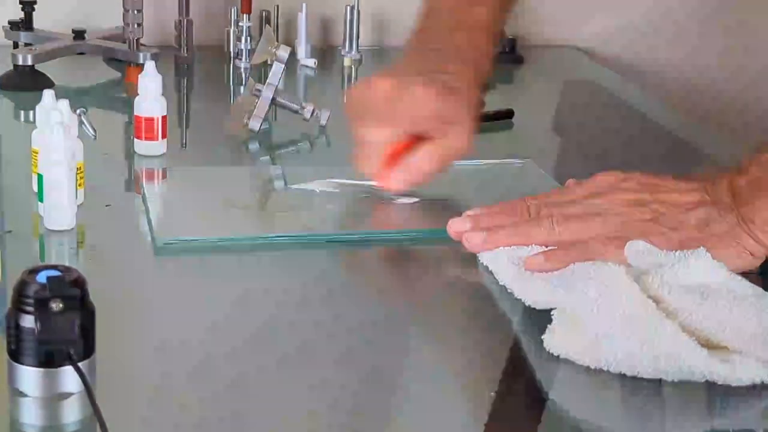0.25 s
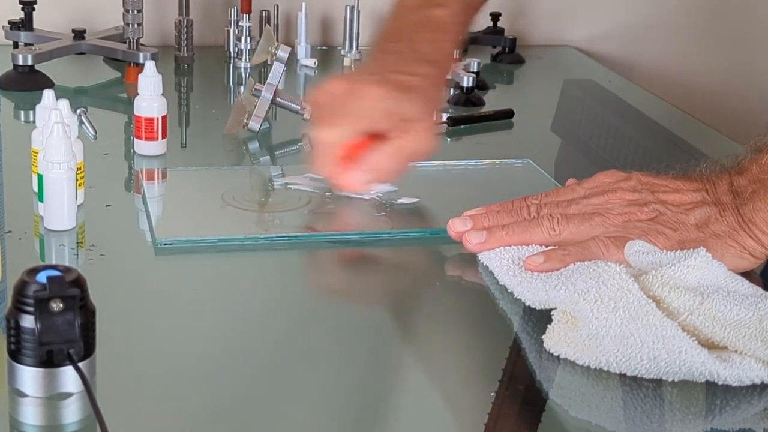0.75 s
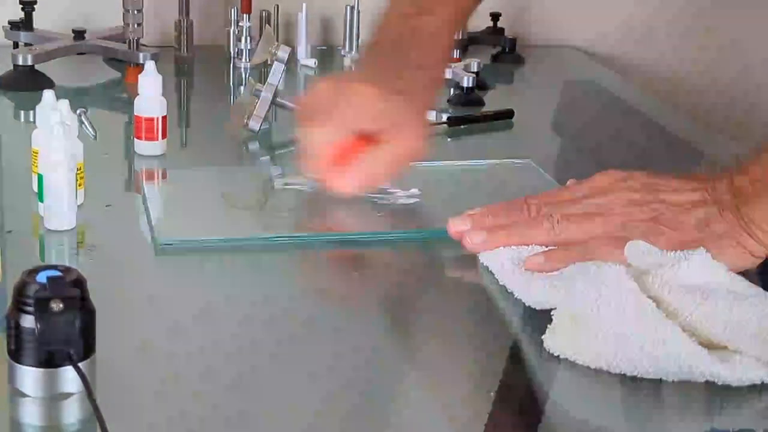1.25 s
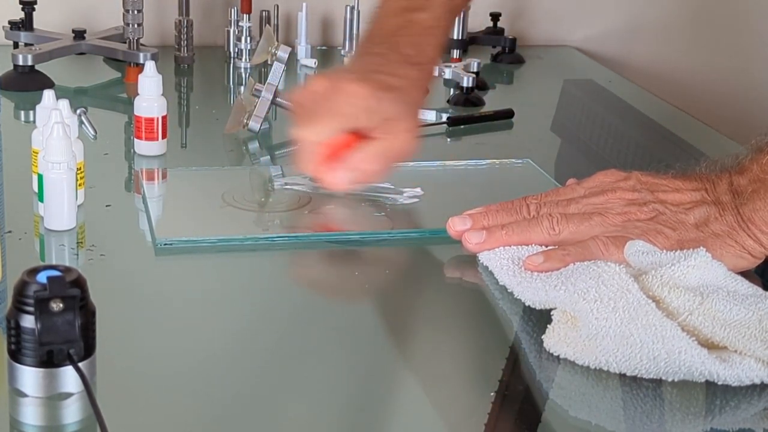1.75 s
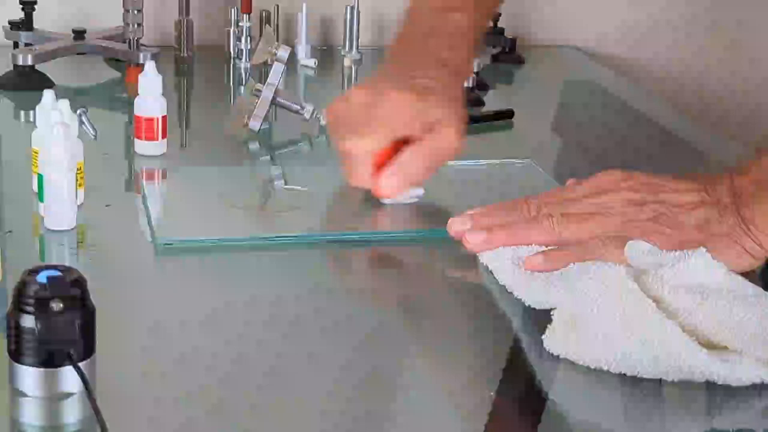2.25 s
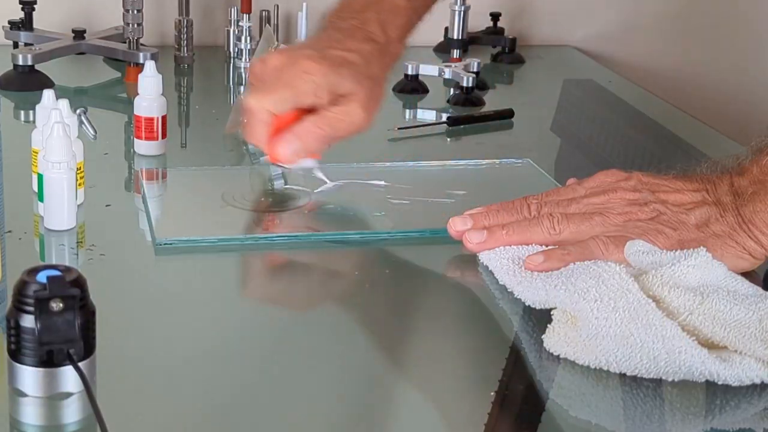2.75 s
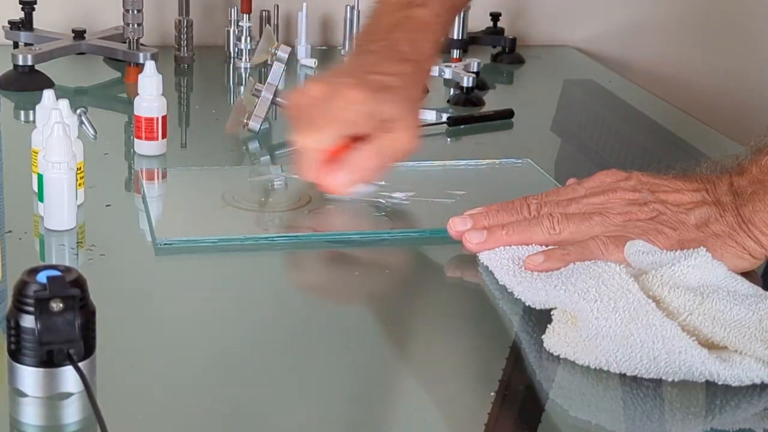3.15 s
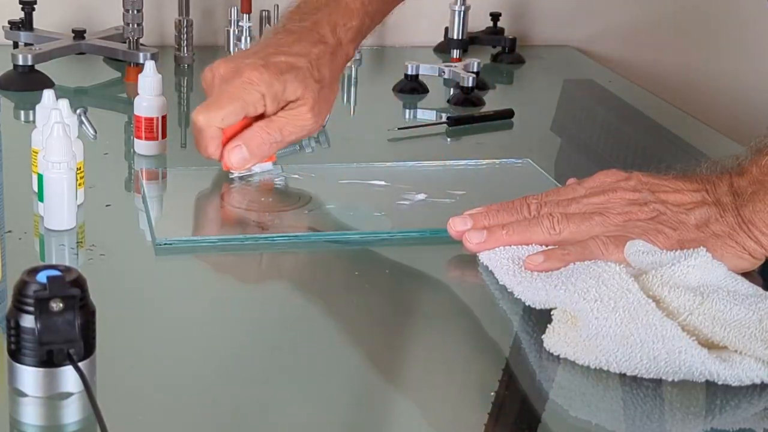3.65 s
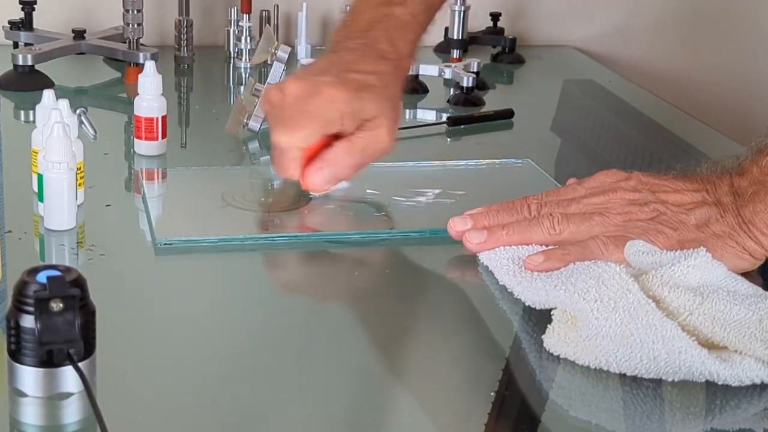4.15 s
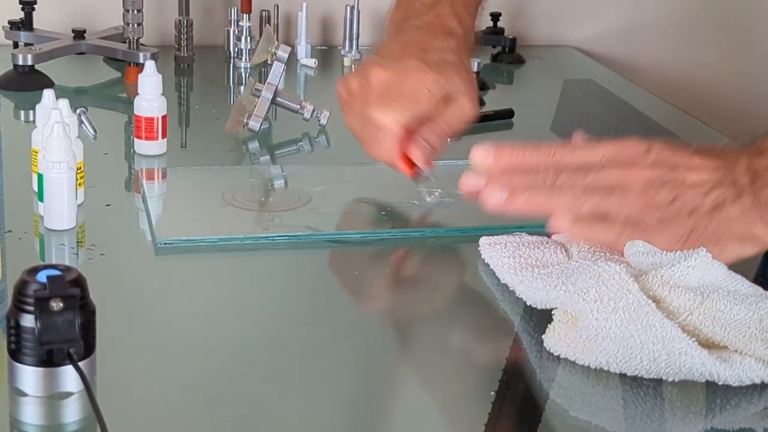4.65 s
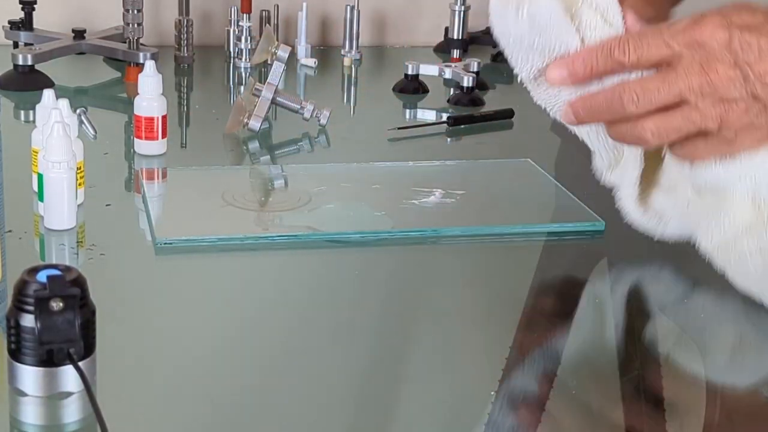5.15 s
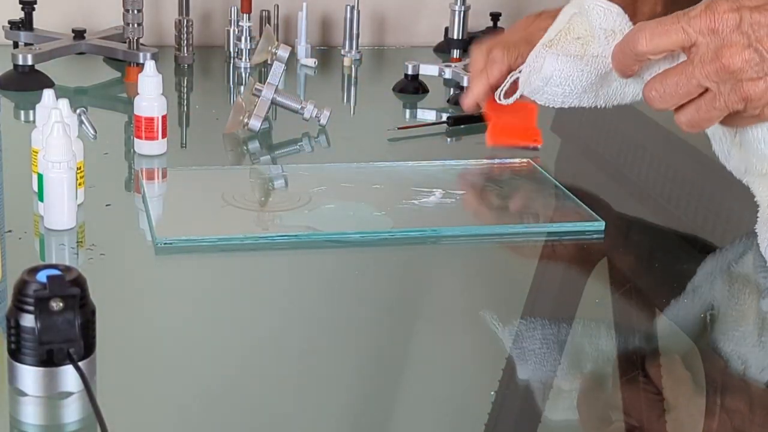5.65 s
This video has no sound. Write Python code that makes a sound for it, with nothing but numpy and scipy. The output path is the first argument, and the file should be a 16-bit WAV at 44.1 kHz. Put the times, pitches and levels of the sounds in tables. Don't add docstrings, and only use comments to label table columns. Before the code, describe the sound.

A nearby stereo microphone catches fast back-and-forth scraping on glass over a table, with hard bright catches and short dull booms. It soon thins to dry, light scratching with a few ticks and a single sharper knock. Near the end come soft cloth brushes, a tiny high squeak and a quick plastic clatter, in a small, short-echo room with wavering low hum.

```python
import sys
import numpy as np
from scipy import signal
from scipy.fft import rfft, irfft, next_fast_len
from scipy.io import wavfile
from scipy.ndimage import map_coordinates

SR = 44100
rng = np.random.default_rng(int(sys.argv[2]) if len(sys.argv) > 2 else 0)


def pcm_store(signal):
    levels = np.round(np.clip(np.atleast_2d(signal), -1, 1) * 32767)
    wavfile.write(sys.argv[1], SR, levels.astype(np.int16).T)


def ratio(d):
    e = np.asarray(d, float) / 20
    return 10 ** e


N = 259749
LIGHT_DB = -67
RISE = 400
SHORT = 4096


def unit(x):
    return x / np.sqrt(np.mean(np.abs(x) ** 2) + 1e-20)


def along(points, hz):
    f, value = np.transpose(points)
    return np.interp(np.log(hz + 1), np.log(f + 1), value)


def curves(rows):
    s, *columns = np.transpose(rows)
    return [np.interp(np.arange(N) / SR, s, column) for column in columns]


def wobble(rate):
    knots = rng.standard_normal(int(N * rate / SR) + 4)
    return map_coordinates(knots, [np.arange(N) * rate / SR])


def filtered(x, response):
    m = next_fast_len(N + SR // 2)
    return irfft(rfft(x, m) * response(np.fft.rfftfreq(m, 1 / SR)), m)[..., :N]


def ringing(modes, f, scatter_db=0):
    total = 0
    for k, (center, width, db) in enumerate(modes):
        strength = (-1) ** k * ratio(db + scatter_db * rng.standard_normal())
        damping = 1j * f * abs(width)
        total = total + strength * damping / (center * center - f * f + damping)
    return total


def gripped(modes, hz, slope_db):
    return [(c, w, db - slope_db * abs(np.log2(c / hz))) for c, w, db in modes]


def grit(shape, spread_db):
    grains = rng.standard_normal(shape)
    size_db = spread_db * np.minimum(rng.exponential(size=shape), 5)
    return unit(grains * ratio(size_db))


# frequency in Hz, correlation from -1 to 1.
LIKENESS = [(60, .96), (130, .88), (300, .65), (700, .5), (1500, .33), (3000, .15), (7000, 0), (15000, -.2)]


def rush(spectrum):
    def spread(hz):
        turn = np.arccos(np.clip(along(LIKENESS, hz), -1, 1)) / 2
        return ratio(along(spectrum, hz)) * [np.cos(turn), np.sin(turn)]
    mid, side = filtered(rng.standard_normal((2, N)), spread)
    return unit(np.array([mid + side, mid - side]))


# frequency in Hz, level in dB.
HUM_TONES = [(117, -65.5), (156, -71.5), (235, -71.5)]
# time in seconds, level in dB.
DRONE_SWELL = [(0, -73), (.26, -53.5), (.42, -69), (.8, -62), (1.8, -57), (2.0, -71.5), (2.3, -56.5),
               (2.9, -64), (3.2, -52), (3.42, -69.5), (4.2, -53), (4.4, -58.5), (4.55, -56), (4.78, -69.5),
               (5.08, -66), (5.27, -55), (5.62, -60), (5.89, -74)]
# frequency in Hz, level in dB per Hz.
RUMBLE_COLOUR = [(18, -62.5), (30, -27), (114, 2), (166, -8.5), (193, -35.5), (223, -13.5), (250, -11),
                 (320, -37), (550, -120)]
# frequency in Hz, level in dB per Hz.
MURMUR_COLOUR = [(88, -41), (150, -3.5), (210, -9.5), (517, -10), (710, -18), (881, -24), (1300, -21),
                 (1690, -62), (2860, -120)]
# frequency in Hz, level in dB per Hz.
AIR_COLOUR = [(410, -32), (700, 1.5), (876, -10), (1190, -13), (1410, -7.5), (1810, -9.5), (2330, -5.5),
              (2520, -1), (4010, -16.5), (6280, -14.5), (8980, -20), (14500, -38), (16500, -51.5)]
# time in seconds, sliding level in dB.
HAND_PRESSURE = [(0.0, -61), (0.31, -67), (0.52, -60), (0.65, -47.5), (0.98, -51), (1.13, -47), (1.36, -56),
                 (1.92, -66), (2.62, -77), (3.12, -69), (3.64, -75), (3.85, -66), (4.91, -68),
                 (5.53, -71.5), (5.89, -57)]


def background():
    drone_db, lean_db = curves(DRONE_SWELL)[0], curves(HAND_PRESSURE)[0]
    t = np.arange(N) / SR
    hum = 0
    for hz, db in HUM_TONES:
        level = ratio(db + 2.5 * wobble(3.4))
        cycles = hz * t + 0.16 * wobble(11.0)
        hum = hum + level * np.sin(2 * np.pi * cycles)
    drone = ratio(drone_db + 4) * np.sin(2 * np.pi * 58.8 * t)
    rumble_db = -55.5 + 0.24 * (drone_db + 62.5)
    rumble = ratio(rumble_db - 5.5 + 0.7 * wobble(13)) * rush(RUMBLE_COLOUR)
    shake = ratio(-68 + 0.95 * (lean_db - LIGHT_DB))
    murmur = (ratio(-66) + shake) * ratio(0.31 * wobble(12)) * rush(MURMUR_COLOUR)
    return rumble + murmur + hum + drone + ratio(-67.0) * rush(AIR_COLOUR)


# frequency in Hz, time to fall by 60 dB in seconds.
ROOM_DECAY = [(200, 0.27), (1000, 0.14), (3000, 0.11), (8000, 0.12), (15000, 0.05)]


def room(x, count=4):
    dull = filtered(x, lambda f: f ** 4 / (f ** 4 + 800 ** 4))
    place = (np.arange(N) // 7400 + np.arange(count)[:, None]) % count == 0
    hz, t, z = signal.stft(rng.standard_normal((count, 2, SR // 3)), SR, nperseg=256)
    fade = ratio(-60 * t / along(ROOM_DECAY, hz)[:, None])
    tail = signal.istft(z * fade, SR, nperseg=256)[1]
    tail = tail / np.linalg.norm(tail, axis=2, keepdims=True)
    tail = np.pad(tail, [(0, 0), (0, 0), (90, 0)])
    return signal.fftconvolve((place * dull)[:, None], tail, axes=2).sum(axis=0)[:, :N]


# frequency in Hz, phase in radians.
LEFT_LEAD = [(60, 0), (700, .3), (1460, .6), (2500, .7), (3000, 1.1), (4400, 1.7), (6000, 1.5), (9000, 1.9),
             (16000, 2.1)]


def ports(x, share):
    delay_s = rng.uniform(0.00041, 0.0037, (2, 4, 1))
    gain = rng.normal(0, 0.78, (2, 4, 1))
    gain = gain / np.linalg.norm(gain, axis=1, keepdims=True) * 0.74

    def heard(f):
        ahead = np.exp(0.5j * share * along(LEFT_LEAD, f) * np.array([[1], [-1]]))
        echoes = (gain * np.exp(-2j * np.pi * f * delay_s)).sum(axis=1)
        return ahead + f * f / (f * f + 6000 ** 2) * echoes
    return filtered(x, heard)


# middle in seconds, length in seconds, level in dB.
CLOTH_RUSTLES = [
    (4.696, 0.067, -66.5),
    (4.737, 0.072, -66),
    (4.91, 0.12, -69),
    (5.34, 0.15, -67),
]
# frequency in Hz, width in Hz, level in dB.
CLOTH_MODES = [(2900, 660, -1), (3900, 890, 4)]


def cloth():
    t = np.arange(N) / SR
    level = 0
    for s, length, db in CLOTH_RUSTLES:
        level = level + ratio(db) * np.cos(np.pi * np.clip((t - s) / length, -0.5, 0.5)) ** 2
    clumps_db = 3.4 * wobble(110)
    fibres = unit(filtered(grit(N, spread_db=3.0), lambda f: ringing(CLOTH_MODES, f)))
    return level * ratio(clumps_db) * fibres


# frequency in Hz, level in dB, time to fall by 60 dB in seconds.
CLINK_TONES = [(2260, -19.5, 0.7), (3300, 8, 0.078), (5300, -11, 0.18), (4250, -1, 0.25), (6500, -0.5, 0.3),
               (8942, -14, 0.23)]


def clink():
    t = np.arange(N) / SR
    tones = 0
    for hz, db, t60 in CLINK_TONES:
        level = ratio(db - 56.5 - 60 * t / t60 + 3.5 * wobble(60))
        tones = tones + level * np.sin(2 * np.pi * hz * t)
    return tones


# time in seconds, pitch in Hz, level in dB.
SQUEAK_PATH = [
    (5.5, 8860, -93),
    (5.53, 9160, -82),
    (5.57, 9400, -73),
    (5.59, 9280, -93),
    (5.64, 9300, -99),
]


def squeak():
    t = np.arange(N) / SR
    hz, db = curves(SQUEAK_PATH)
    on = (t > SQUEAK_PATH[0][0]) & (t < SQUEAK_PATH[-1][0])
    level = on * ratio(db - 5.0 + 2.6 * wobble(90))
    return level * np.sin(2 * np.pi * np.cumsum(hz + 40 * wobble(120)) / SR)


def contact(t60, rise_s, snap, slip, size):
    t = (np.arange(size) - RISE) / SR
    fade = ratio(-60 * np.abs(t) / max(t60, 0.003))
    force = np.where(t < 0, np.exp(t / rise_s), fade) * grit(size, spread_db=1.0)
    slips = RISE + np.cumsum(rng.uniform(0.03, 0.064, size=3) * t60 * SR).astype(int)
    force[RISE] += snap
    force[slips] += slip * snap * np.array([0.6, -0.5, 0.4])
    return rfft(force)


def add(out, s, force, response, db):
    ring = irfft(force * response)
    out[round(s * SR):][:len(ring)] += ratio(db) * ring / np.abs(ring).max()


# frequency in Hz, width in Hz, level in dB.
TOOL_TOP = [(8130, 790, -5.5), (8730, 820, 0.5), (10010, 2700, -2.5), (11140, 2800, -5.5),
            (13980, 3000, -17.5)]


def clacks(events, grips, core, edge, slip, rise_s):
    out, f = np.zeros(N + SHORT), np.fft.rfftfreq(SHORT, 1 / SR)
    for s, db, hz, edge_db, t60 in events:
        grip = [grips[0], *(g for g in grips if g[0] <= s)][-1]
        _, focus_db, edge_hz, top_db, snap = grip
        force = contact(t60, rise_s, snap, slip, size=SHORT)
        chatter = contact(t60, rise_s, 0.7 * snap, slip, size=SHORT)
        add(out, s, force, ringing(gripped(core, hz, focus_db), f, scatter_db=3.0), db + 0.5)
        edge_modes = gripped(edge, edge_hz, slope_db=5)
        add(out, s, force, ringing(edge_modes, f, scatter_db=3.0), db + edge_db + 6.0)
        add(out, s, chatter, ringing(TOOL_TOP, f, scatter_db=1.5), db + edge_db + top_db + 9.5)
    return out[RISE:][:N]


# time in seconds, peak in dB, loudest pitch in Hz,
# brightness in dB, time for the chatter to fall by 60 dB in seconds.
HOLDER_HITS = [
    (5.6524, -21, 1870, -10.5, 0.029),
    (5.683, -22, 2060, -18, 0.035),
    (5.69, -33, 2020, -9.5, 0.03),
    (5.7073, -14.5, 2230, -4.5, 0.031),
    (5.7125, -27, 2240, -5, 0.033),
    (5.7185, -25.5, 3340, 0, 0.053),
    (5.726, -39, 3340, 5, 0.034),
    (5.743, -36.5, 3340, -3, 0.057),
    (5.759, -24.5, 2700, -2, 0.088),
]
# time in seconds, focus in dB per octave,
# loudest edge pitch in Hz, top level in dB, snap over chatter as a ratio.
HOLDER_TOUCH = [
    (5.6, 11.5, 3800, -11, 26),
    (5.67, 20, 4200, -4.5, 19),
    (5.698, 7.9, 3900, -4, 28),
    (5.735, 9.3, 4380, -6, 17),
]
# frequency in Hz, width in Hz, level in dB.
HOLDER_MODES = [(1800, 490, 0.091), (2230, 440, 0.85), (2700, 590, -1.7), (3340, 230, -0.62)]
# frequency in Hz, width in Hz, level in dB.
HOLDER_EDGE_MODES = [(3730, 220, 7), (4580, 280, -5.5), (5000, 1300, -20), (6580, 1200, 5.5)]


def dropped_holder():
    return clacks(HOLDER_HITS, HOLDER_TOUCH, HOLDER_MODES, HOLDER_EDGE_MODES, slip=0.91, rise_s=0.0026)


# time in seconds, pane level in dB, loudest pane pitch in Hz, boom in dB.
GLASS_PUSHES = [(0.156, -33, 310, -54), (0.476, -29, 415, -40), (0.592, -26.5, 560, -35.5),
                (0.61, -22, 560, -34.5), (0.762, -17.5, 690, -32.5), (0.833, -36.5, 417, -43),
                (0.924, -33, 607, -36.5), (0.946, -26, 500, -33), (1.015, -34.5, 410, -35),
                (1.118, -28.5, 640, -31.5), (1.188, -32, 570, -41), (1.244, -36.5, 580, -39),
                (1.274, -24, 513, -33), (1.352, -44, 382, -62), (1.421, -34.5, 433, -37),
                (1.576, -43, 713, -36.5), (1.595, -37, 412, -48), (1.682, -49, 310, -41.5),
                (1.757, -46, 410, -48), (1.787, -39, 640, -56.5), (2.075, -35, 412, -44),
                (2.54, -47.5, 303.6, -45), (2.844, -45.5, 406, -47.5), (3.628, -44, 278, -50),
                (3.7896, -25.5, 570, -42), (3.803, -42.5, 297, -49), (5.356, -48, 700, -65.5),
                (4.167, -51, 490, -49.5), (4.857, -45, 300, -43.5), (4.872, -47, 318, -57)]
# time in seconds, pane level in dB, loudest pane pitch in Hz.
HOLDER_THUDS = [
    (5.652, -43.5, 439),
    (5.688, -41, 390),
    (5.711, -35, 420),
    (5.74, -38.5, 700),
    (5.76, -41.5, 332),
]
# frequency in Hz, width in Hz, level in dB.
PANE_MODES = [(287, 17, 1), (310, 39, -3.5), (412, 23, 2), (491, 18, -2.5), (542, 39, -4.5),
              (621, 27, -0.5), (693, 51, -3.5), (992, 55, -4)]
# frequency in Hz, width in Hz, level in dB.
TABLE_MODES = [(58.3, 2.5, -2), (79, 9.1, -3.5), (97.4, 6, -10.5)]
# frequency in Hz, width in Hz, level in dB.
TABLE_TOP_MODES = [(156.8, 8, -1), (178, 6.1, -14)]


def glass():
    size = 8192
    out, f = np.zeros(N + size), np.fft.rfftfreq(size, 1 / SR)
    thuds = [(*thud, -69) for thud in HOLDER_THUDS]
    for s, db, hz, boom_db in [*GLASS_PUSHES, *thuds]:
        force = contact(t60=0.059, rise_s=0.0022, snap=9, slip=1.0, size=size)
        force = force / (1 + 1j * f / 1300) ** 2
        add(out, s, force, ringing(gripped(PANE_MODES, hz, slope_db=11.5), f, scatter_db=1.5), db + 0.5)
        add(out, s, force, ringing(TABLE_MODES, f, scatter_db=1.0), boom_db)
        top_db = -45 + 0.64 * (db + 35)
        add(out, s, force, ringing(TABLE_TOP_MODES, f), top_db)
    return out[RISE:][:N]


# time in seconds, level in dB, pitch in Hz, time to fall by 60 dB in seconds.
BLADE_PINGS = [(.485, -26, 3070, .02), (0.48, -27.5, 2900, .015), (.596, -24, 2285, 0.027),
               (.611, -23, 4140, 0.025), (.611, -36, 6940, .015), (.618, -23, 6050, .025),
               (.76, -21, 3900, .025), (.765, -19, 2410, 0.011), (.767, -27, 9990, 0.017),
               (.773, -24.5, 1152, 0.044), (.951, -16, 2950, .02), (.951, -21, 5300, 0.02),
               (.98, -31.5, 1380, .03), (1.115, -15, 5760, 0.015), (1.117, -21, 2670, 0.023),
               (1.117, -23, 4720, 0.019), (1.117, -22, 9160, 0.012), (1.163, -39, 1710, .05),
               (1.195, -34.5, 2760, .05), (1.274, -29.5, 1230, .04), (3.789, -39, 6230, 0.02),
               (2.0756, -30.5, 2000, 0.01), (2.844, -46.5, 2700, 0.019), (3.793, -27.5, 1720, 0.021),
               (3.791, -33.5, 3120, .025), (4.177, -54.5, 6250, 0.03), (4.177, -62, 5300, .025),
               (5.689, -37, 2046, 0.044), (5.708, -19, 8660, 0.018), (5.718, -29.5, 3970, 0.034),
               (5.762, -35, 2700, 0.03), (5.762, -42, 4400, 0.051)]
# time in seconds, level in dB, pitch in Hz, time to fall by 60 dB in seconds.
PANE_BLOOMS = [(.592, -25.5, 530, 0.049), (.616, -32.5, 965, 0.036), (.66, -39, 475, .06),
               (.761, -24, 618, .05), (.83, -39, 1243, .04), (.962, -32.5, 896, .05),
               (1.014, -33, 692, 0.037), (1.277, -34.5, 960, 0.047), (1.112, -33, 650, 0.062),
               (1.121, -29, 897, 0.055), (1.2, -38, 546, 0.054), (1.288, -36, 475, 0.064),
               (3.789, -29, 605, 0.036), (3.805, -40.5, 480, 0.047), (2.08, -50, 713, 0.056),
               (4.865, -45, 340, .09), (5.72, -41, 710, 0.077), (5.722, -37, 347, 0.08),
               (5.736, -48, 400, .06)]


def pings():
    out, t = np.zeros(N + SHORT), np.arange(SHORT) / SR
    for s, db, hz, t60 in [*BLADE_PINGS, *PANE_BLOOMS]:
        swell = 1 - np.exp(-t * hz / 2.5)
        fade = ratio(db + 6.5 - 60 * t / t60)
        out[round(s * SR):][:SHORT] += fade * swell * np.sin(2 * np.pi * hz * t)
    return out[:N]


# middle in seconds, blade level in dB.
SAW_STROKES = [(0.647, -38.5), (0.733, -52.5), (0.828, -44.5), (0.926, -38), (0.991, -40.5), (1.1, -39.5),
               (1.165, -46.5), (1.258, -48), (1.35, -66), (1.425, -48.5), (1.521, -71), (1.598, -52.5),
               (1.684, -58.5), (1.762, -53)]
# middle in seconds, length in seconds, blade level in dB,
# hiss against the blade in dB.
LIGHT_STROKES = [(1.9, 0.036, -74.5, -2.5), (2.212, 0.075, -64, -10.5), (2.312, 0.04, -71.5, 0.5),
                 (2.665, 0.076, -61, -14), (2.97, 0.18, -63.5, -10), (3.096, 0.066, -62.5, -6),
                 (3.167, 0.13, -60.5, -7.5), (3.288, 0.065, -64.5, -6.5), (3.349, 0.083, -62, -8),
                 (3.774, 0.071, -62.5, -5), (3.906, 0.044, -63.5, -10), (3.996, 0.1, -62, -23),
                 (4.134, 0.078, -66.5, -5), (4.187, 0.048, -64.5, -8.5), (4.212, 0.04, -64, -6),
                 (4.418, 0.034, -62.5, -12), (4.565, 0.043, -66.5, -8.5), (3.938, 0.056, -70, -14),
                 (4.349, 0.16, -63.5, -11), (4.402, 0.069, -62, -14.5), (4.535, 0.095, -66, -20.5),
                 (5.568, 0.073, -71.5, -15.5), (1.042, .03, -60, -13)]
# middle in seconds, length in seconds, hiss level in dB.
HAND_BRUSHES = [(0.008, 0.11, -61.5), (4.62, 0.022, -70), (4.688, 0.073, -71.5), (4.782, 0.056, -82),
                (4.908, 0.13, -65.5), (5.205, 0.064, -71.5), (5.289, 0.11, -66.5), (5.353, 0.12, -61.5),
                (5.573, 0.27, -74), (5.695, 0.13, -46.5), (5.76, 0.21, -61)]
# frequency in Hz, width in Hz, level in dB.
SLIDING_BLADE = [(1540, 120, -1), (1980, 390, 1.5), (2280, 120, 4), (2650, 420, -5)]
# frequency in Hz, width in Hz, level in dB.
SLIDING_EDGE = [(3900, 1000, -2), (5560, 380, -3), (6220, 570, -3), (7400, 520, -7), (8800, 500, -5),
                (10100, 740, -6.5), (11990, 3200, -15.5)]


def slide():
    lean_db, t = curves(HAND_PRESSURE)[0], np.arange(N) / SR
    hiss_db = LIGHT_DB - 3 + 1.3 * (lean_db - LIGHT_DB)
    level = ratio([lean_db, hiss_db]) * ratio(-6.0)
    passes = [(s, 0.068, db, db - 4.5) for s, db in SAW_STROKES]
    passes += [(s, length, db, db + hiss) for s, length, db, hiss in LIGHT_STROKES]
    passes += [(s, length, db - 3, db) for s, length, db in HAND_BRUSHES]
    for s, length, *db in passes:
        near = slice(max(round((s - length / 2) * SR), 0), round((s + length / 2) * SR))
        level[:, near] += ratio(db)[:, None] * np.cos(np.pi * (t[near] - s) / length) ** 2
    clumps_db = 1.8 * wobble(45) + 1.1 * wobble(160)
    blade = unit(filtered(grit(N, spread_db=6.0), lambda f: ringing(SLIDING_BLADE, f)))
    hiss = unit(filtered(grit(N, spread_db=3.5), lambda f: ringing(SLIDING_EDGE, f)))
    return ratio(clumps_db) * (level[0] * blade + level[1] * hiss)


# time in seconds, peak in dB, loudest blade pitch in Hz,
# brightness in dB, time for the chatter to fall by 60 dB in seconds.
RESIN_CATCHES = [(0.155, -28.5, 1800, -1.5, 0.028), (0.4763, -12.5, 2230, -6, 0.017),
                 (0.5918, -5.5, 1960, -10, 0.026), (0.6113, -7.5, 1830, -4.5, 0.025),
                 (0.7614, -1.5, 2310, -14.5, 0.03), (0.834, -23.5, 1980, -12.5, 0.03),
                 (0.9087, -41, 2290, -1, 0.016), (0.9241, -23, 2130, -21, 0.054),
                 (0.9472, -6, 2280, -8, 0.03), (1.015, -20.5, 1900, -12, 0.039),
                 (1.1144, -4.5, 1730, -9, 0.031), (1.1886, -19, 1700, -12.5, 0.034),
                 (1.2455, -33, 1560, -7.5, 0.23), (1.2765, -11.5, 2260, -14, 0.027),
                 (1.3523, -37.5, 1980, -15.5, 0.021), (1.4251, -32, 2100, -12.5, 0.0036),
                 (1.519, -44.5, 1700, -8.5, 0.026), (1.574, -36.5, 1700, -18, 0.026),
                 (1.5937, -34, 1540, -16, 0.056), (1.682, -43, 1957, -16, 0.034),
                 (1.7879, -29, 1620, -13.5, 0.039)]
# time in seconds, peak in dB,
# loudest blade pitch in Hz, brightness in dB, time for the chatter to fall by 60 dB in seconds.
EDGE_TAPS = [(2.073, -25.5, 1800, -13.5, 0.012), (2.541, -31, 3270, 3, .016),
             (2.8417, -31.5, 1650, -7, 0.026), (3.3098, -44.5, 2210, -19.5, .03),
             (3.3552, -45.5, 2240, -11, 0.029), (3.6282, -34, 1970, 3, 0.018),
             (3.79, -15.5, 1650, -15, 0.038), (4.1697, -39.5, 2050, -15.5, 0.065),
             (4.3792, -45, 1990, -8, 0.081), (4.609, -57, 1980, -1, 0.017), (4.83, -51, 2006, -1.5, 0.036)]
# time in seconds, peak in dB,
# loudest blade pitch in Hz, brightness in dB, time for the chatter to fall by 60 dB in seconds.
BITES_AND_SLIPS = [(0.158, -27, 1860, -16, 0.027), (0.479, -18.5, 2240, -4.5, 0.024),
                   (0.586, -20.5, 1800, -9.5, 0.026), (0.597, -16, 1960, -6, 0.035),
                   (0.615, -22, 2160, 4.5, .02), (0.7572, -15, 1870, -20, .02),
                   (0.7648, -3.5, 2480, -11.5, .03), (0.932, -28, 2290, -5, .03),
                   (0.9426, -17.5, 2190, -13.5, 0.018), (0.9498, -7.5, 1660, -7, .025),
                   (0.9565, -15.5, 2650, -11, 0.016), (0.96, -16.5, 1594, -13, 0.045),
                   (1.0183, -20, 2630, -14, 0.03), (1.1098, -19, 1900, -8.5, .02),
                   (1.125, -18.5, 1616, -15.5, .02), (1.128, -15, 2650, -20.5, .02),
                   (1.133, -27.5, 1900, -14, .03), (1.2732, -17, 2200, -13, 0.013),
                   (1.2825, -18, 2900, -17, 0.022), (1.289, -44, 2800, -29, .03),
                   (2.0774, -31.5, 2280, -4.5, 0.017), (2.5433, -38, 1145, -9.5, 0.0144),
                   (2.548, -41, 3250, -6.5, 0.022), (2.8462, -36.5, 2300, -5, 0.0178),
                   (3.6317, -41.5, 1610, 7, 0.017), (3.633, -39.5, 1590, 5, 0.016),
                   (3.7822, -43, 1650, -23, .03), (3.799, -31.5, 1630, -18, .025),
                   (4.857, -49.5, 1990, -18, .02)]
# time in seconds, focus in dB per octave,
# loudest edge pitch in Hz, top level in dB, snap over chatter as a ratio.
BLADE_GRIP = [(0, 23, 3400, -1.5, 24), (0.4, 1.5, 3900, -5, 26), (0.55, 23, 4150, -7, 22),
              (0.605, 9, 6300, -8, 27), (0.7, 12, 3900, -9, 23), (0.8, 17, 4200, -3.5, 5),
              (0.88, 25, 4750, -9.5, 23), (0.99, 6, 5540, -7, 7.7), (1.07, 19, 6040, -8, 17),
              (1.16, 7, 6000, -9, 9.7), (1.23, 6, 5330, -12, 12), (1.33, 4, 5000, -1.5, 3.1),
              (1.74, 4, 4200, -14.5, 8.9), (2.0, 13.5, 3440, -5, 24), (2.4, 18.5, 5800, -11.5, 19),
              (2.7, 9, 4800, -8.5, 23), (3.2, 17, 5000, -8.5, 7.2), (3.5, 7, 6500, 0, 29),
              (3.7, 41.5, 6160, -7.5, 26), (4.0, 17, 5000, -11.5, 2.5), (4.5, 15.5, 6220, 7.5, 6.6),
              (4.75, 10.5, 6470, -14.5, 9.5)]
# frequency in Hz, width in Hz, level in dB.
BLADE_MODES = [(1155, 51, -1.5), (1340, 90, -8.5), (1474, 140, -3.5), (1644, 120, 1), (1960, 220, -3),
               (2226, 140, -0.5), (2584, 110, 0.5), (2893, 160, -2.5), (3270, 75, -7)]
# frequency in Hz, width in Hz, level in dB.
EDGE_MODES = [(3400, 570, 0), (4043, 200, 3.5), (4200, 270, -0.5), (4800, 440, -2.5), (5400, 500, -2),
              (6130, 670, 1.5), (7070, 1200, -3.5), (7720, 680, -4)]


def chipping_blade():
    contacts = [*RESIN_CATCHES, *EDGE_TAPS, *BITES_AND_SLIPS]
    return clacks(contacts, BLADE_GRIP, BLADE_MODES, EDGE_MODES, slip=0.16, rise_s=0.0033)


def scene():
    scraper = chipping_blade() + slide() + glass() + cloth() + pings()
    holder = dropped_holder() + (clink() + squeak())
    direct = ports(scraper, share=1) + ports(holder, share=0.4)
    return direct + ratio(-8.5) * room(scraper + holder) + background()


def band_limit(x):
    return signal.sosfilt(signal.butter(12, 16500, fs=SR, output="sos"), x)


def record(dry):
    x = filtered(dry, lambda f: (1j * f) ** 2 / ((1j * f) ** 2 + 1.3j * f * 48 + 48 ** 2))
    x = x / (1 + np.abs(x / 0.97) ** 6) ** (1 / 6)
    mix = filtered(x, lambda f: np.clip((16500 - f) / 1800, 0, 1))
    return band_limit(mix)


dry = scene()
out = record(dry)
pcm_store(out)
```